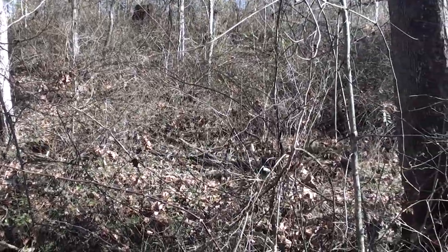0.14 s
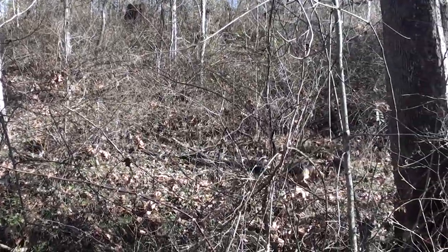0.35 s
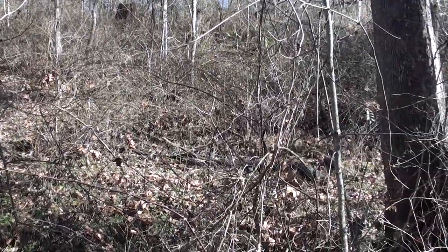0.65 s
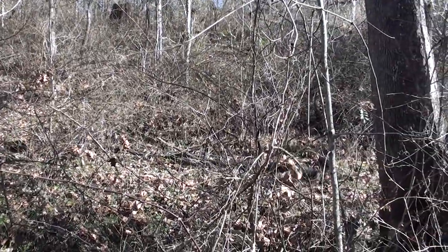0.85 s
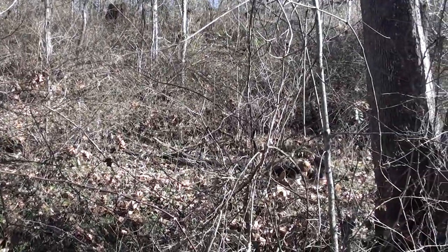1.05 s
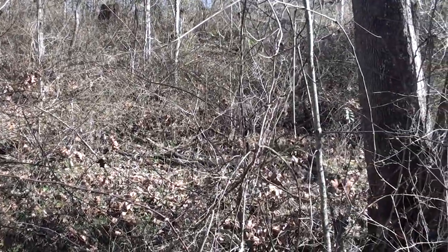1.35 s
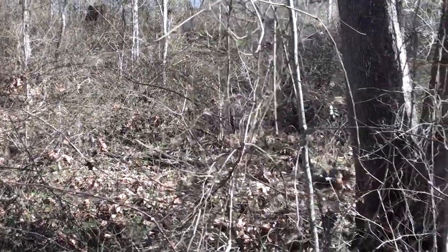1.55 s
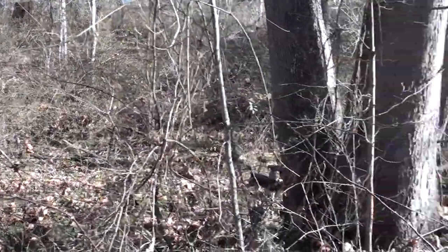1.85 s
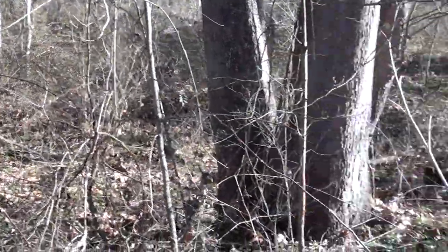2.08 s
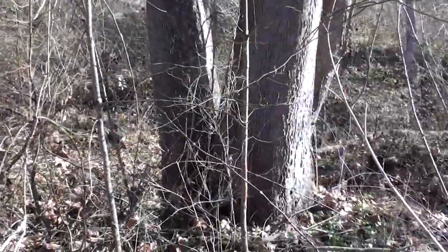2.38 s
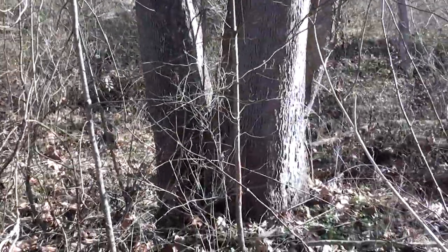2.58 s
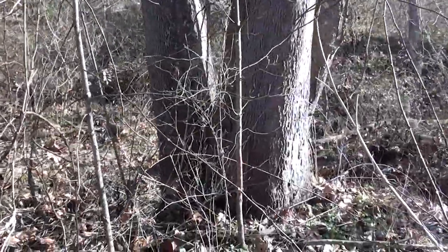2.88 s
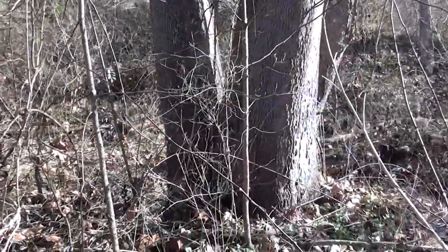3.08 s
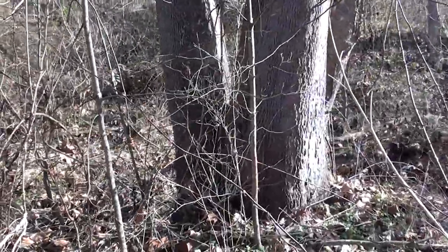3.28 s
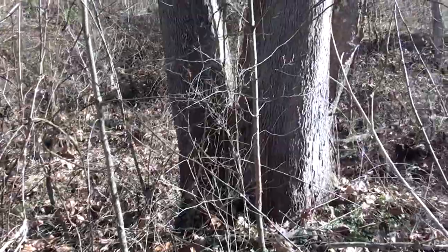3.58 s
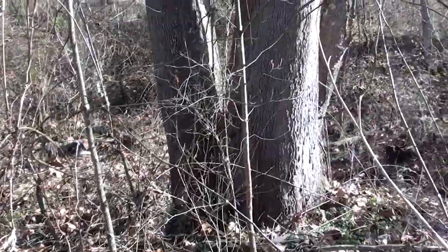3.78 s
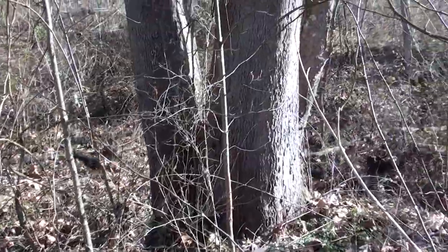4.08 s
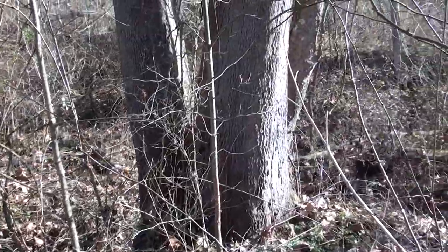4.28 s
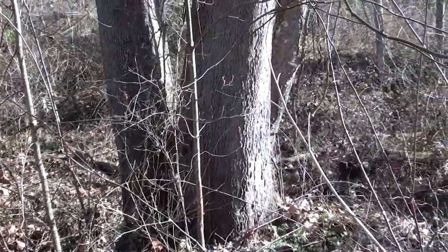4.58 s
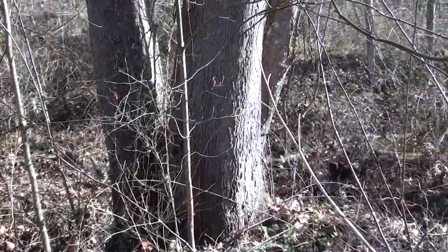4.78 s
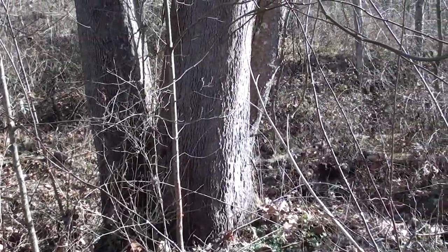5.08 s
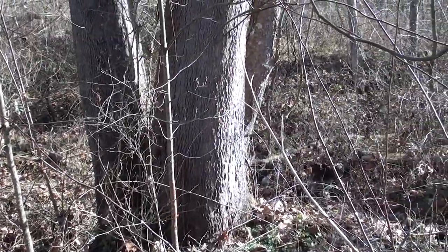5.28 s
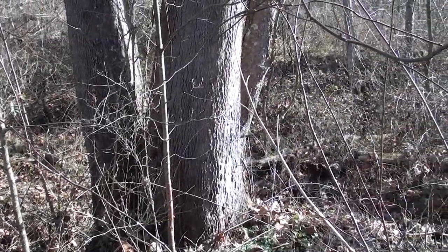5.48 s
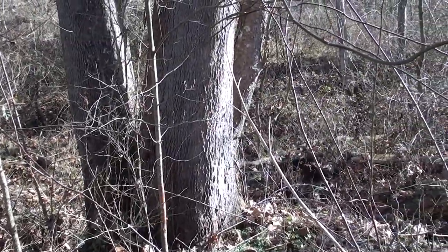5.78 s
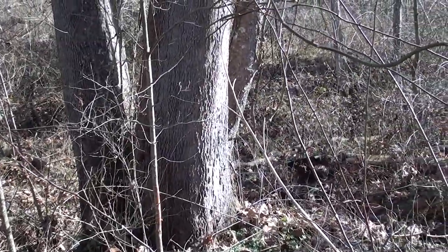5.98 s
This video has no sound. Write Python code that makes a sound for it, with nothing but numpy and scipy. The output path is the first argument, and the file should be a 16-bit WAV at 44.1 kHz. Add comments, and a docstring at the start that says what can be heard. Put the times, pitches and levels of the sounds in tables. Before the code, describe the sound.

Short barks, a drawn-out bay and a high howl from hunting dogs echo among trees over rustling leaves and snapping twigs.

```python
"""Hounds call in bare, brushy woods, in a light wind. As an old echo fades, they bark: chains of short,
nearly pure notes, the voice jumping between low and high. Then paws crackle through dry leaves, twigs
snap and a gust buffets the microphone. A drawn-out bay follows at 3 s and a yelp near 4 s. After 5 s
come a bark, a high howl and one last bark. The tree trunks answer every call with a long, thin echo."""
import sys
import numpy as np
from scipy import signal
from scipy.fft import rfft, irfft, next_fast_len
from scipy.io import wavfile
from scipy.ndimage import uniform_filter1d, minimum_filter1d

SR = 44100
rng = np.random.default_rng(int(sys.argv[2]) if len(sys.argv) > 2 else 0)


def materialize(psi):
    """Save the field psi as 16-bit PCM at rate SR to the path in sys.argv[1].

    A 1-D psi becomes a single channel; in a 2-D psi each row is a channel.
    """
    bounded = np.clip(np.atleast_2d(psi).T, -1, 1)
    quanta = np.round(bounded * 32767).astype(np.int16)
    wavfile.write(sys.argv[1], SR, quanta)


N = 270950
TIME = np.arange(N) / SR
FFT_SIZE = next_fast_len(N)


def from_db(db):
    """Turn decibels into a number to multiply by."""
    return 10 ** (np.asarray(db) / 20)


def normalise(x):
    """Scale a sound to an average (rms) size of 1."""
    return x / np.sqrt(np.mean(np.abs(x) ** 2))


def per_frequency(points):
    """Spread (frequency, value) points over the whole spectrum."""
    hz, value = np.transpose(points)
    bin_hz = np.arange(FFT_SIZE // 2 + 1) * SR / FFT_SIZE
    return np.interp(np.log(bin_hz + 1), np.log(hz), value)


def colour(x, points):
    """Turn lows and highs up or down by (frequency [Hz], gain [dB]) points."""
    return irfft(rfft(x, FFT_SIZE) * from_db(per_frequency(points)), FFT_SIZE)[:N]


def wobble(rate, size):
    """A smooth random wiggle of about +-1 that changes about `rate` times a second."""
    k = max(int(SR / rate), 1)
    smooth = uniform_filter1d(uniform_filter1d(rng.standard_normal(size + 2 * k), k), k)
    return np.sqrt(3 * k / 2) * smooth[k:k + size]


# How strong the wind is: (time [s], level [dB])
WIND_LEVELS = [(0, -58.5), (2.5, -58.5), (2.8, -40.5), (3.15, -50), (4.3, -54.5), (5.6, -62.5)]
# Its deep rumble: (frequency [Hz], gain [dB])
WIND_COLOUR = [(20, -33), (45, -6), (70, -1), (160, -2.5), (400, -46)]
def wind():
    """Gusts rumble on the microphone."""
    rumble = normalise(colour(rng.standard_normal(N), WIND_COLOUR))
    return rumble * from_db(np.interp(TIME, *np.transpose(WIND_LEVELS)) + 2 * wobble(20, N))


# Paws in dry leaves: (time [s], level [dB])
LEAF_LEVELS = [(0, -35.5), (1.3, -35), (2.05, -37.5), (2.4, -34.5), (2.52, -30), (2.62, -26.5), (2.73, -35),
               (3.7, -37), (4.5, -39), (6.14, -37)]
# The lows and highs of the rustle: (frequency [Hz], gain [dB])
LEAF_COLOUR = [(88, -50), (150, 2.5), (524, -5.5), (702, -0.5), (888, 2), (2360, -2), (3220, -5),
               (6770, -1), (9630, -8.5), (16000, -35.5)]
def leaves():
    """Leaves give tiny cracks, bunched by each footfall, over the steady hiss of far ones."""
    footfalls = from_db(4.9 * wobble(28, N))
    rustle = 0
    for hz in 250 * 2 ** np.arange(0, 6.1, .5):  # bands half an octave apart
        strength = from_db(4.5 * np.minimum(rng.exponential(size=N), 4.5))
        cracks_per_s = hz ** .5 * 1.2 * footfalls
        cracks = (rng.random(N) < cracks_per_s / SR) * strength
        crumble = uniform_filter1d(cracks, int(0.0043 * SR))  # each crack lasts a few ms
        crackle = rng.standard_normal(N) * (1 + 0.83 * normalise(crumble))
        band = signal.butter(2, [hz / 2 ** .25, hz * 2 ** .25], "band", fs=SR, output="sos")
        rustle = rustle + signal.sosfilt(band, crackle)
    level_db = np.interp(TIME, *np.transpose(LEAF_LEVELS))
    return normalise(colour(rustle, LEAF_COLOUR)) * from_db(level_db)


# Twigs snapping: (time [s], peak level [dB], centre frequency [Hz])
TWIG_SNAPS = [(0.3061, -9, 7000), (0.6294, -18, 6120), (1.125, -21, 6250), (1.8514, -2, 6000),
              (1.8897, -19, 7230), (1.9819, -14.5, 5700), (2.4788, -17, 6460), (2.593, -14, 6900),
              (2.6198, -7.5, 4900), (2.9642, -19, 7120), (3.026, -8.5, 4100), (3.1752, -5, 5350),
              (4.2459, -29, 4014), (4.6818, -23, 5170), (5.8588, -16, 7000), (5.99, -13.5, 7140)]
# Duller knocks of paws on wood: (time [s], peak level [dB], centre frequency [Hz])
PAW_KNOCKS = [(1.153, -23, 2500), (2.744, -21.5, 493), (3.026, -17, 1410), (4.515, -26, 1140),
              (4.573, -23, 547.5), (4.774, -26.5, 1016), (4.945, -35, 398), (5.006, -24.5, 1310),
              (5.865, -24, 1266)]
def wood_hits(rows, width_ratio, ring_s):
    """Wood snaps or is knocked: a short burst in one band of noise, with a faint crumbling tail."""
    out, t = np.zeros(N + 4096), TIME[:4096]
    fade = 1000 ** (-t / ring_s) + 0.082 * 1000 ** (-t / 0.13)
    for start, db, hz in rows:
        edges_hz = [hz / width_ratio, min(hz * width_ratio, .45 * SR)]
        band = signal.butter(2, edges_hz, "band", fs=SR, output="sos")
        crack = signal.sosfilt(band, rng.standard_normal(len(t)) * fade)
        i = int(start * SR)
        out[i:i + len(t)] += from_db(db) * crack / np.abs(crack).max()
    return out[:N]


ECHO_S, ECHO_DB, ECHO_HZ = 1.93, -10.5, 700  # time to fade by 60 dB, level, strongest frequency
# The echo of a call that is already over: (pitch [Hz], width [Hz], starting level [dB])
OLD_ECHO = [(603, 140, -31.5)]
def old_echo():
    """A blurred tone still rings among the trees and dies away."""
    ring = 0
    for hz, width, db in OLD_ECHO:
        blur = wobble(width, N) + 1j * wobble(width, N)
        ring = ring + from_db(db) * (blur * np.exp(2j * np.pi * hz * TIME)).real
    return ring * 1000 ** (-TIME / ECHO_S)


def trunk_echo(calls):
    """Echoes off many trunks build up, then fade. Gives a centre part and a faint side part."""
    t = TIME[:2 * SR]
    build_up = 1 - np.exp(-t / 0.021)
    fade = 1000 ** (-t / ECHO_S) + 3.66 * 1000 ** (-t / 0.31)
    bounces = rng.standard_normal((2, len(t))) * build_up * fade
    bounces /= np.sqrt(np.sum(bounces[0] ** 2))
    centre, side = signal.fftconvolve(calls[None], bounces, axes=1)[:, :N]
    band = [(ECHO_HZ / 4, -12), (ECHO_HZ, 0), (ECHO_HZ * 2 ** 1.1, -6), (9000, -25)]
    return from_db(ECHO_DB) * colour(centre, band), from_db(ECHO_DB - 17) * colour(side, band)


# A voice is a stack of pure tones, or partials: (multiple of the pitch, level to follow, gain [dB]).
# Strong and weak throat pulses take turns, adding "halves" midway between the usual partials.
TONE, OVERTONES, HALVES, UPPER = range(4)
# How the mouth shapes the overtones: (frequency [Hz], gain [dB])
MOUTH_COLOUR = [(1100, 2.5), (1400, 1.5), (1750, -7.5), (2200, -5.5), (2550, -11.5), (2900, -19),
                (3600, -37)]
def voice(rows, partials, breathiness):
    """The vocal folds sing one wavering note, blurred by breath. Gives its tone and breath strength."""
    times, hz, *levels = np.transpose(rows)
    a, b = int(times[0] * SR), min(int(times[-1] * SR), N)
    t = TIME[a:b]
    pitch = np.interp(t, times, hz) * (1 + 0.00544 * wobble(104, b - a))
    phase = 2 * np.pi * np.cumsum(pitch) / SR
    tone, breath = out = np.zeros((2, N))
    for multiple, follows, db in partials:
        haze = (wobble(277, b - a) + 1j * wobble(235, b - a)) / np.sqrt(2)
        blur = min(breathiness * multiple ** .8, 1)  # higher partials blur more
        waver_db = (0.76 + 2.55 * np.log(np.clip(multiple, 1, 2))) * wobble(41, b - a)
        level_db = db + waver_db + np.interp(t, times, levels[follows])
        if follows == OVERTONES:
            level_db += np.interp(multiple * pitch, *np.transpose(MOUTH_COLOUR))
        wave = (np.sqrt(1 - blur ** 2) + blur * haze) * np.exp(1j * multiple * phase)
        tone[a:b] += np.sqrt(2) * from_db(level_db) * wave.imag
    breath[a:b] = breathiness * from_db(np.interp(t, times, levels[TONE]))
    from_edge_s = np.minimum(t - t[0], t[-1] - t + (b == N))
    out[:, a:b] *= np.clip(from_edge_s / 0.00415, 0, 1)  # quick fades avoid clicks
    return out


def plain_partials():
    """The tone and four overtones, with gains falling in 2 dB steps."""
    return [(1, TONE, 0)] + [(k + 2, OVERTONES, -2 * k) for k in range(4)]


ATTACK_S, RELEASE_S, EDGE_DB, OVERTONE_FADE_DB = 0.0063, 0.012, -4.5, -4.5
# The notes in the barks: (start [s], length [s], first pitch [Hz], last pitch [Hz], level [dB],
# change over the note [dB], overtones next to the tone [dB], halves likewise [dB], breathiness [0-1])
BARK_NOTES = [ (0.186, 0.067, 1076, 1097, -14, -6.5, 5.5, -18.5, 0.27),
              (0.206, 0.06, 551.5, 547, -24, 7, -22, -16.5, .05),
              (0.243, 0.046, 799, 677, -15, -4, -3, -30, 0.99),
              (0.431, 0.018, 700, 706, -11.5, 2, -9, -40, 0.4),
              (0.448, 0.054, 543, 569, -15, 1, -9, -21.5, 0.09),
              (0.490, 0.063, 685, 680.5, -9, -5, -36, -34, 0.6),
              (0.534, 0.06, 1047, 1069, -14.5, -6, -35, -42, 0.3),
              (0.811, 0.015, 740, 880, -15.5, 3, -27, -40, 0.39),
              (0.823, 0.031, 581, 556, -8, -3.5, -10.5, -26.5, 0.039),
              (0.850, 0.1, 700, 700, -10.5, -8.5, -34, -42, 0.28),
              (0.853, 0.054, 823, 834, -8.5, -13, -35, -40, 0.97),
              (0.904, 0.051, 1021, 872, -7.5, -15.5, -8, -46, 0.12),
              (1.184, 0.03, 744, 955, -13, 3, -33, -40, 0.16),
              (1.198, 0.045, 544.5, 600.5, -12, -0.5, -14, -35, 0.14),
              (1.222, 0.077, 722, 681, -4.5, -17.5, -41, -40, 0.47),
              (1.265, 0.079, 1018, 996, -19, 0.5, -5.5, -40, 0.35),
              (3.94, 0.094, 700, 722, -11.5, -12.5, -28, -36, 0.34),
              (5.036, 0.029, 780, 926, -20.5, 19, -23, -43, 0.078),
              (5.058, 0.1, 661.3, 649.7, -14, -1.5, -42, -21, 0.62),
              (5.058, 0.059, 533, 552, -16.5, -12, -36, -40, 0.057),
              (5.065, 0.035, 835, 816, -15.5, 2.5, -38, -50, 0.13),
              (6.053, 0.033, 898, 839, -16, 3.5, -1, -47, 0.34),
              (6.077, 0.067, 804.5, 715, -12, 5.5, -14.5, -18.5, 0.57), ]
def barks():
    """The voice jumps between short sliding notes; each swells, holds and sinks back."""
    partials = plain_partials() + [(1 / 2, HALVES, -12), (3 / 2, HALVES, -3), (5 / 2, HALVES, 0)]
    out = 0
    for start, length, first_hz, last_hz, db, change_db, over_db, half_db, breathiness in BARK_NOTES:
        t = np.array([0, min(ATTACK_S, length / 3), length - min(RELEASE_S, length / 3), length])
        progress = t / length
        pitch = first_hz + (last_hz - first_hz) * progress
        tone_db = db + change_db * progress + EDGE_DB * np.array([1, 0, 0, 1])
        overtone_db = tone_db + over_db + OVERTONE_FADE_DB * progress  # overtones die sooner
        rows = np.transpose([start + t, pitch, tone_db, overtone_db, tone_db + half_db])
        out = out + voice(rows, partials, breathiness)
    return out


# The long bay: (time [s], pitch [Hz], tone [dB], overtones [dB])
BAY = [(3.055, 502, -38, -60), (3.075, 544, -19, -41), (3.095, 622, -10.5, -16.5), (3.14, 727, -11, -32),
       (3.17, 749.4, -13.5, -31), (3.22, 677, -22.5, -32), (3.24, 677, -13.5, -32.5), (3.29, 674, -13, -45),
       (3.325, 667.4, -16.5, -47), (3.365, 659, -12.5, -40), (3.39, 658, -19, -49),
       (3.415, 669, -12.5, -44), (3.435, 684, -25.5, -42), (3.455, 674, -10.5, -38), (3.5, 665, -16.5, -43),
       (3.525, 613, -8, -43), (3.545, 500, -36, -52), (3.6, 172, -51, -67)]
# The shorter yelp: (time [s], pitch [Hz], tone [dB], overtones [dB])
YELP = [(3.845, 482, -39, -42), (3.871, 563, -29, -22.5), (3.895, 601, -18.5, -14.5), (3.925, 657, -8, -31),
        (3.931, 663.6, -11.5, -62), (3.957, 718, -22, -29), (3.965, 732, -12.5, -47),
        (3.999, 439.4, -26, -30), (4.02, 347, -37, -33)]
def bay_and_yelp():
    """Two drawn-out calls that rise in pitch and drop at the end."""
    partials = plain_partials()
    return voice(BAY, partials, breathiness=0.14) + voice(YELP, partials, breathiness=0.16)


# The howl: (time [s], pitch [Hz], tone [dB], partial 2 [dB], halves [dB], upper partials [dB])
HOWL = [(5.15, 989, -33, -31, -65, -65), (5.175, 1060, -31, -27, -58, -65),
        (5.245, 1133, -14.5, -35, -41, -57), (5.3, 1079, -12.5, -27, -28.5, -49),
        (5.345, 1104, -12.5, -34, -34, -52), (5.39, 1142, -19, -33, -48, -53),
        (5.44, 1163, -14.5, -33, -50, -45), (5.53, 1136, -12.5, -19.5, -62, -45.5),
        (5.575, 1158, -18.5, -34, -62, -55), (5.6, 1245, -25.5, -66, -63, -68),
        (5.62, 1302, -20.5, -26, -60, -61), (5.64, 1228, -11, -25, -61, -50),
        (5.68, 1162, -9.5, -8.5, -48, -44), (5.72, 1134, -10, -19.5, -33.5, -47),
        (5.755, 1102, -13, -18, -61, -47.5), (5.775, 1010, -16.5, -20.5, -70, -70),
        (5.788, 954, -54, -50, -72, -82)]
# Its upper partials, numbers 3 to 8: (gain [dB])
HOWL_UPPER = [-7, 6.5, 3, -1, 3, -18]
def howl():
    """A high, held call with little breath in it."""
    partials = plain_partials()[:2] + [(1 / 2, HALVES, -1), (3 / 2, HALVES, 0)]
    partials += [(k + 3, UPPER, db) for k, db in enumerate(HOWL_UPPER)]
    return voice(HOWL, partials, breathiness=0.076)


# Moments when the voice throbs: (start [s], end [s], rate [Hz], depth [0-1])
THROBS = [(3.1, 3.234, 67, 0.55), (5.203, 5.38, 107.6, 0.51)]
def throb():
    """A slower fold in the throat joins in and makes the loudness beat unevenly."""
    gain = np.ones(N)
    for start, end, hz, depth in THROBS:
        a, b = int(start * SR), int(end * SR)
        phase = 2 * np.pi * np.cumsum(hz * (1 + 0.094 * wobble(41.5, b - a))) / SR
        gain[a:b] += depth * np.sqrt(np.hanning(b - a)) * np.sin(phase)
    return gain


# Breath rushing through the throat: (frequency [Hz], gain [dB])
RASP_COLOUR = [(350, -51), (600, 5), (900, 5.5), (1400, -1), (1900, 0), (2900, -23.5), (6000, -48)]
def hounds():
    """All the calls together: the sung tone plus the rasp of breath."""
    tone, breath = barks() + bay_and_yelp() + howl()
    sung = throb() * tone
    rasp = normalise(colour(rng.standard_normal(N), RASP_COLOUR))
    return sung + from_db(-8) * breath * rasp


# The sound shifts as the microphone turns: (time [s], left minus right [dB])
PAN = [(0, 0.6), (3.6, 0), (5.2, 2)]
def scene():
    """Mix in stereo: nearly all sound comes from one direction, and a faint side part adds width."""
    dogs = hounds()
    echo, side_echo = trunk_echo(dogs)
    centre = dogs + echo + old_echo() + leaves()
    centre += wood_hits(TWIG_SNAPS, width_ratio=1.59, ring_s=0.0036)
    centre += wood_hits(PAW_KNOCKS, width_ratio=1.35, ring_s=0.022)
    centre += wind()
    duller = [(250, -10), (3000, -0.5), (4500, 0), (9000, -8.5)]
    side = side_echo + from_db(-12) * colour(leaves(), duller) + from_db(-24) * wind()
    pan_db = np.interp(TIME, *np.transpose(PAN))
    return centre * from_db(np.array([pan_db, -pan_db]) / 2) + np.array([side, -side])


# How far the microphone's two sides are out of step: (frequency [Hz], left's phase lead [rad])
MIC_PHASE = [(430, -.5), (1000, -.5), (2000, -.2), (8000, 0)]
def record(dry):
    """The microphone shifts the phase, adds hiss, holds loud peaks down and cuts the highest treble."""
    phase_shift = np.exp(.5j * per_frequency(MIC_PHASE) * np.array([[1], [-1]]))
    hiss = from_db(-54.5) * rng.standard_normal(N)  # the amplifier's own noise
    stereo = irfft(rfft(dry, FFT_SIZE) * phase_shift, FFT_SIZE)[:, :N] + hiss
    peak = np.abs(stereo).max(axis=0) + 1e-9
    wanted_gain = np.minimum(.5 / peak, 1) ** 0.66
    hold = int(0.0038 * SR)
    gain = uniform_filter1d(minimum_filter1d(wanted_gain, hold), hold)
    treble_cut = signal.ellip(8, .2, 80, 15950, fs=SR, output="sos")
    return signal.sosfilt(treble_cut, stereo * gain)


dry = scene()
out = record(dry)
materialize(out)
```